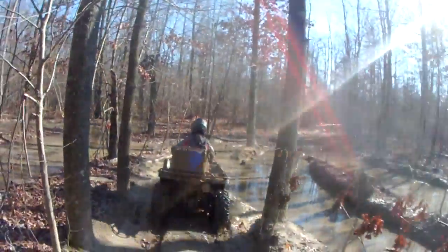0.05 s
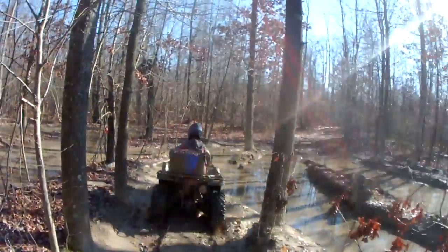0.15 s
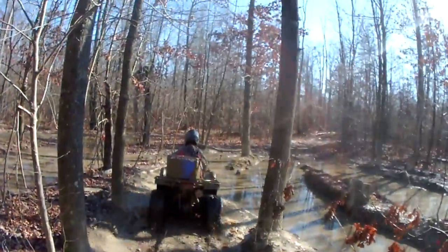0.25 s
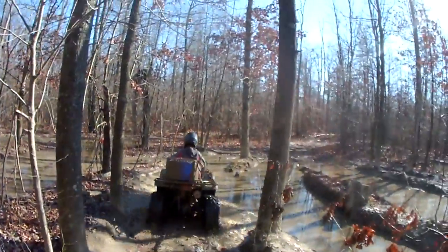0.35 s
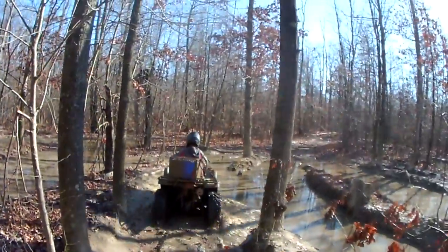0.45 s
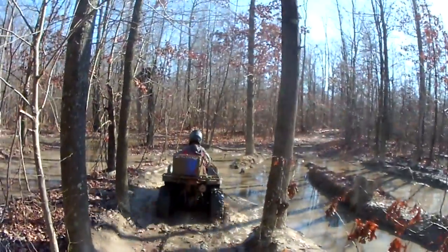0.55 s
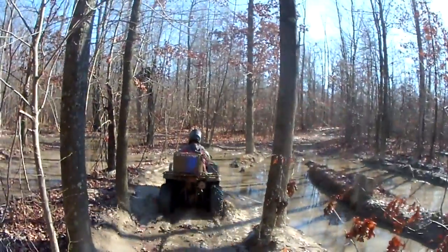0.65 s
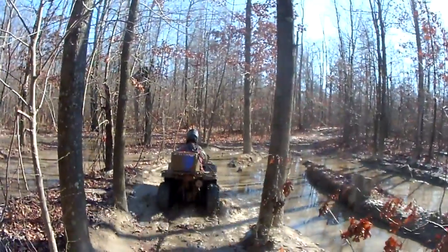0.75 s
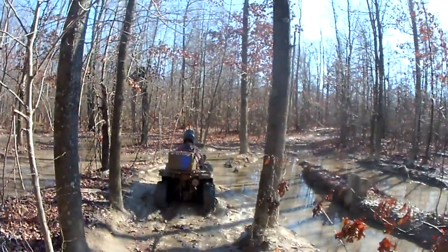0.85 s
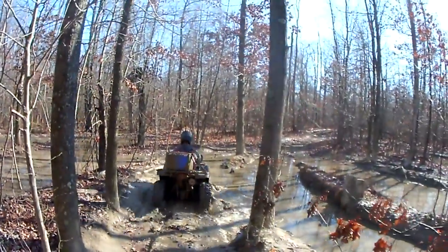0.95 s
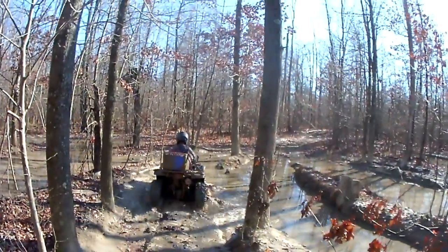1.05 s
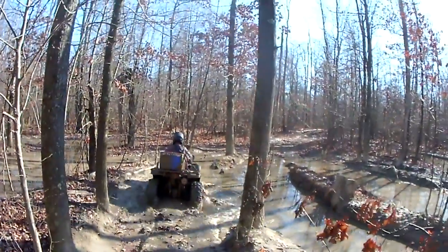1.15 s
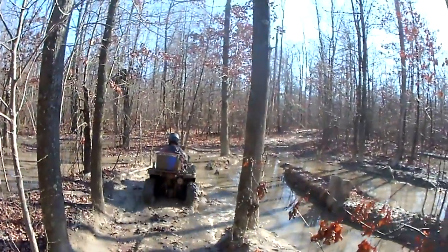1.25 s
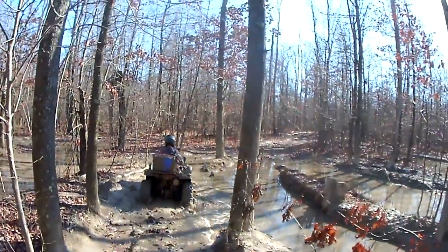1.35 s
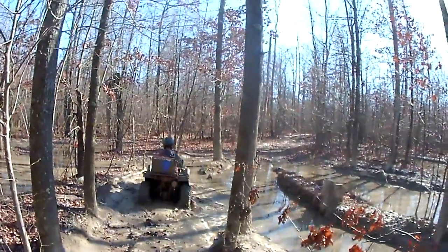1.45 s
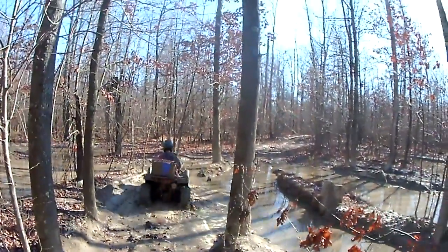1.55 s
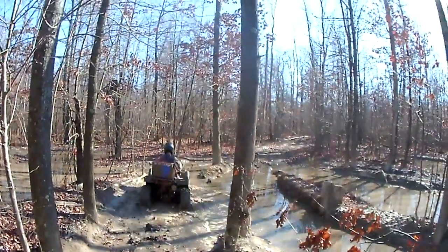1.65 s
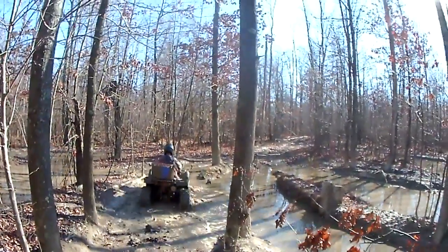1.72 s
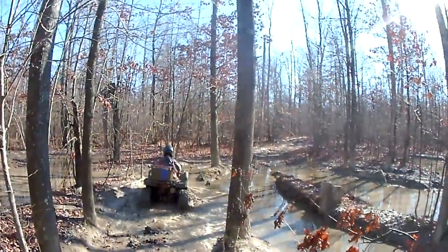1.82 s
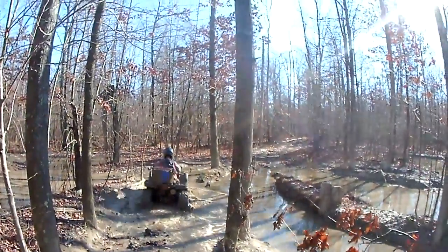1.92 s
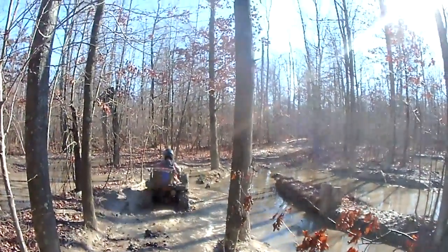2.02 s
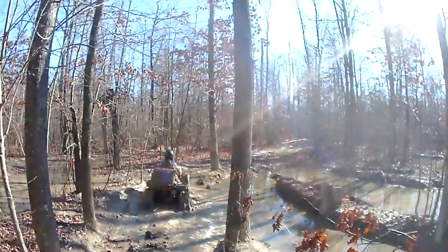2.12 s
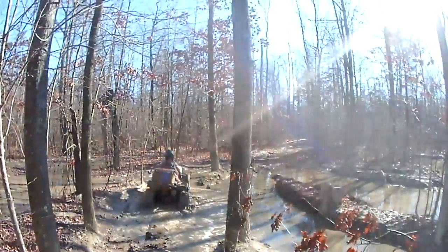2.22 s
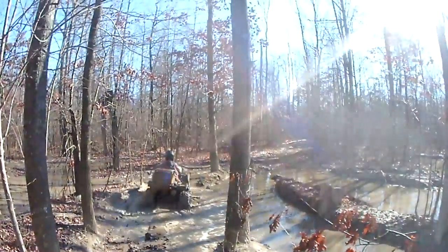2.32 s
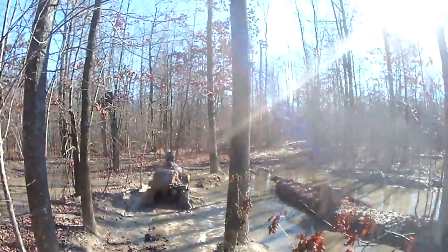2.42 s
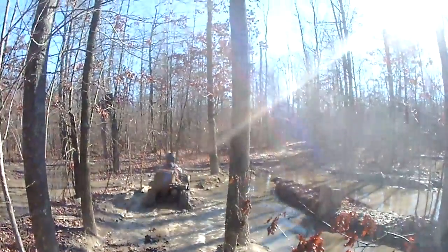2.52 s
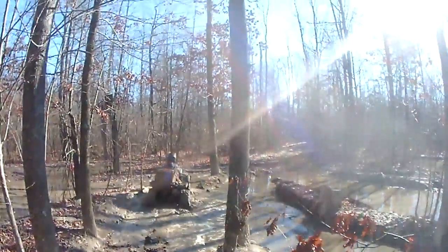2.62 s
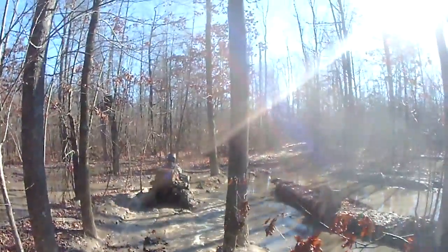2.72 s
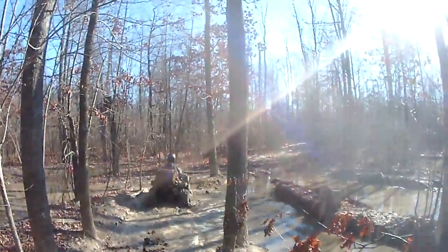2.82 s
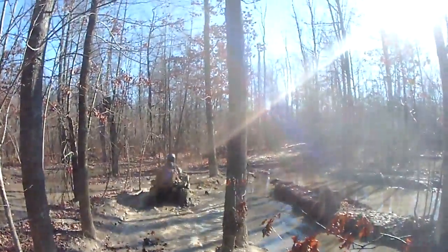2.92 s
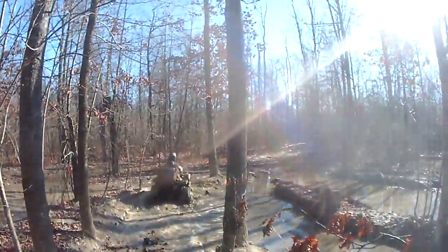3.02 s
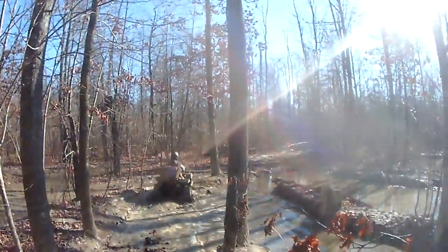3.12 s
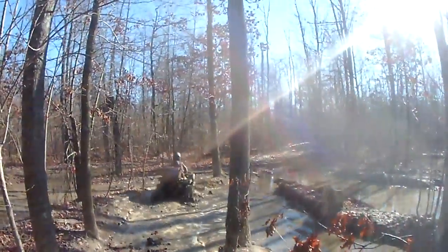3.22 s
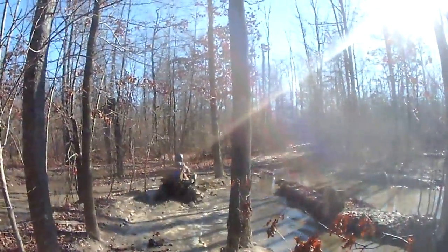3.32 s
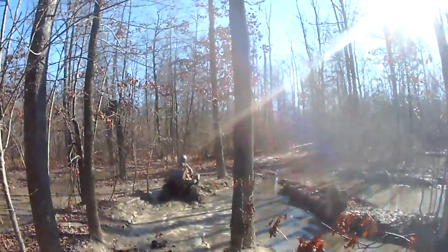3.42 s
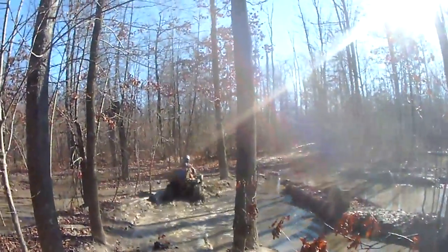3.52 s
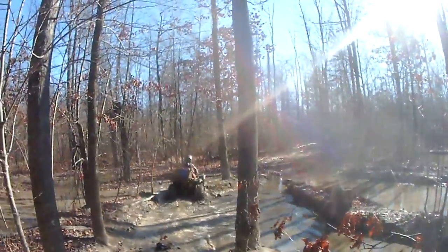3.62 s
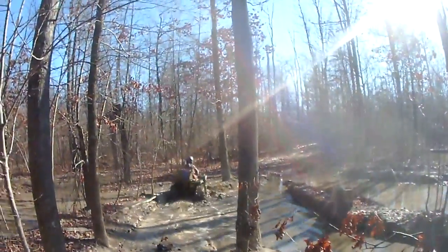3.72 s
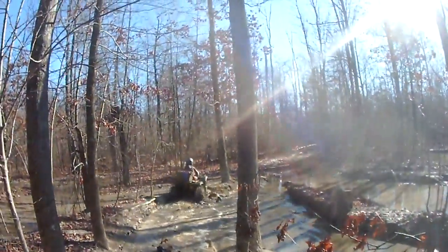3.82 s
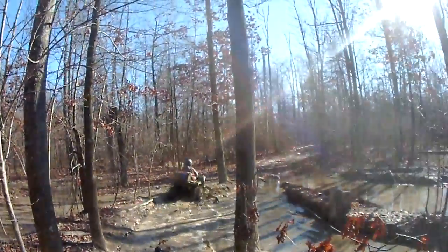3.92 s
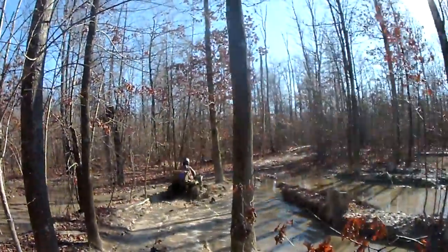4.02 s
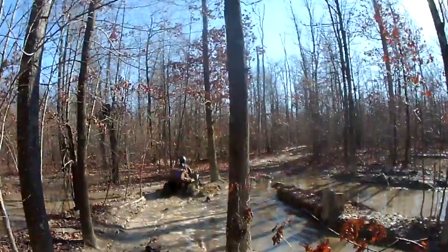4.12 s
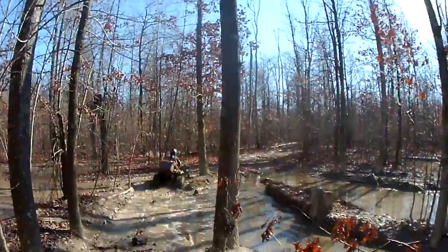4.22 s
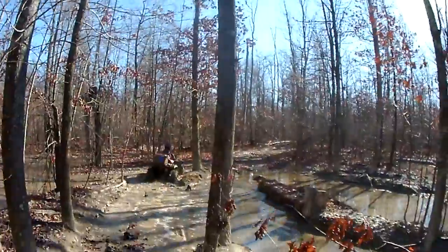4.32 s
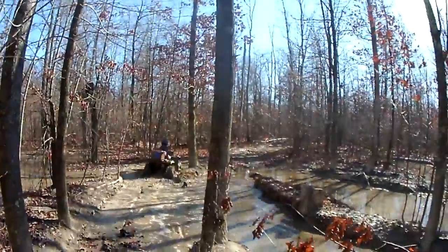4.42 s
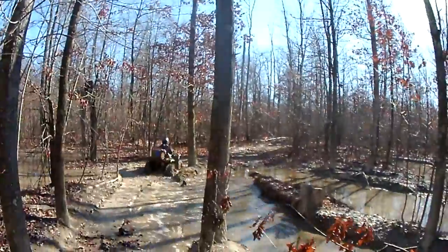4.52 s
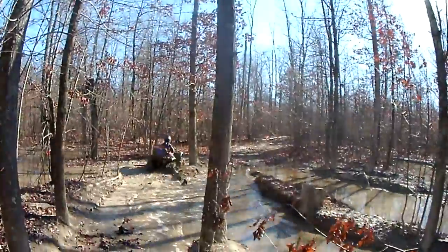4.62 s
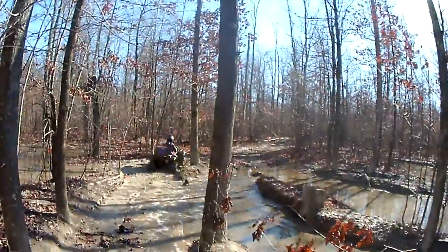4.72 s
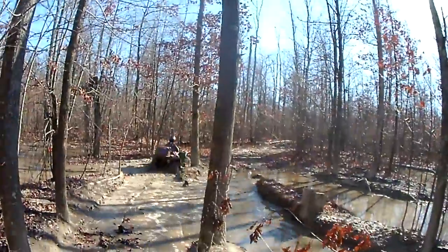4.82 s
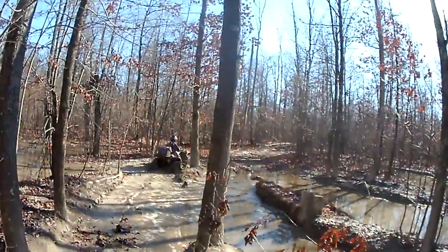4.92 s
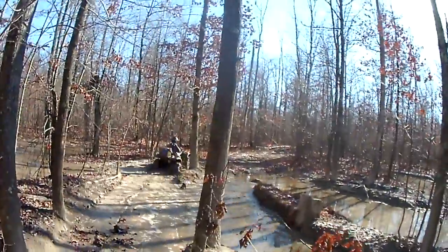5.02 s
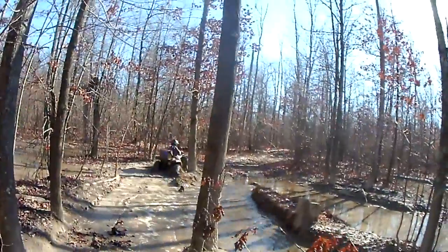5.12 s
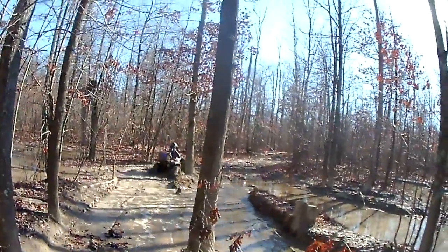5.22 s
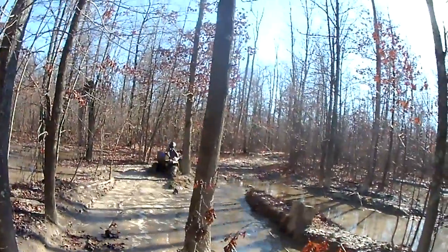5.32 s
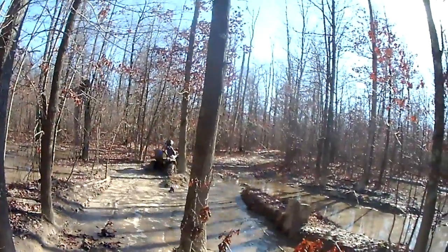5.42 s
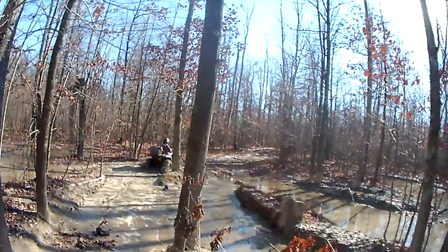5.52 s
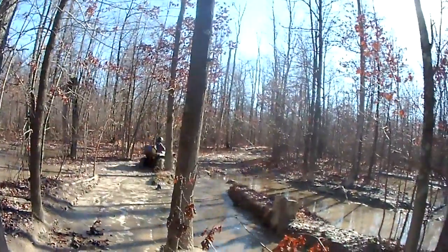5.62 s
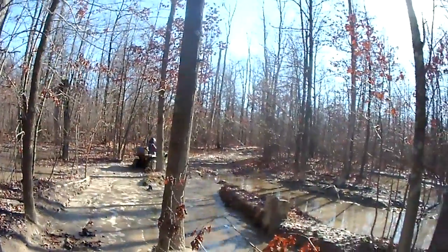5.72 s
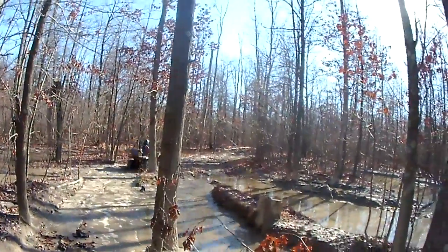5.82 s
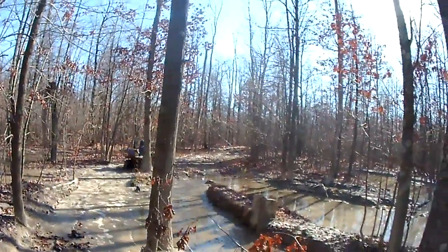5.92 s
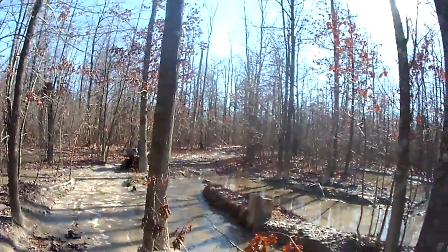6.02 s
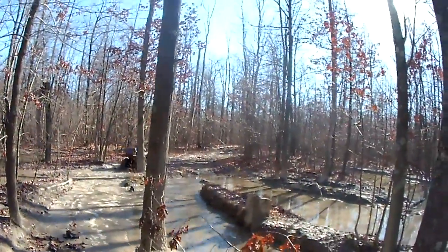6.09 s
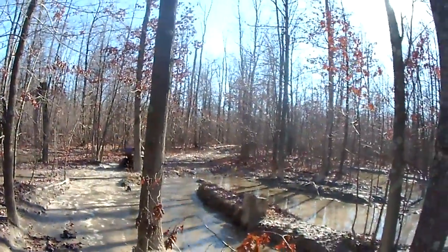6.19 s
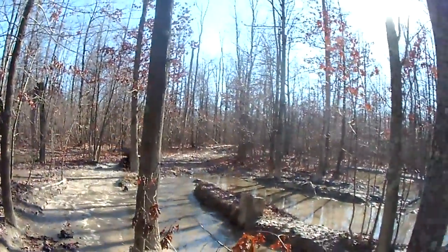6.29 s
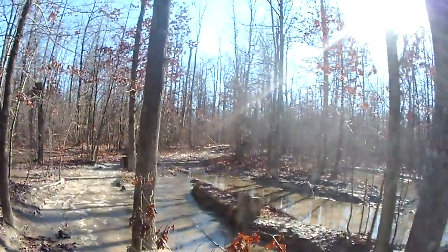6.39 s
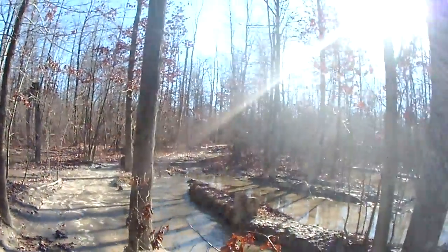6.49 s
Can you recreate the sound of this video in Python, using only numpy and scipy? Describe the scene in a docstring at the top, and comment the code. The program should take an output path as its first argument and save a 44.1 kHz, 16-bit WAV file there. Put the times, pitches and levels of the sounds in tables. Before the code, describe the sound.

A single-cylinder four-wheeler works through a mud hole in bare woods, its separate exhaust pulses audible as a fast, throaty putter of about 15 to 25 per second. It starts low and lugging, with hissing tyre spray, lumpy sloshing and a faint low rumble. Throttle stabs at about 0.3 and 0.8 seconds make the bark swell. From 1.4 to 3.9 a long pull raises the revs; the slosh fades while broad rasp and a nasal metallic muffler ring around 1.7 kHz grow, with irregular harsh cracks overloading the small microphone, strongest near 3.2 to 3.8. The throttle closes and the engine drops back. Five short blips follow at about 4.2, 4.6, 5.1, 5.6 and 6.1, the first still strong, later ones much quieter as the machine draws away. Spray thins, and at the end, near 6.5, a weak ringing putter remains.

```python
"""Four-wheeler in a mud hole

A single-cylinder four-wheeler labours away through mud in bare woods: two stabs of throttle, one long pull, five blips.
Each firing, roughly 15 to 25 a second, sets the modes of the exhaust pipe thumping and lets out a jet of gas,
heard as a broad rasp and the ring of the muffler; an open throttle raises the revs and strengthens the bark.
Shaped noise makes the hissing spray, the sloshing water and a low rumble; the hardest barks overload the microphone."""
import sys
import numpy as np
from scipy import signal
from scipy.fft import rfft, irfft, next_fast_len
from scipy.io import wavfile
from scipy.ndimage import map_coordinates

SR = 44100
rng = np.random.default_rng(int(sys.argv[2]) if len(sys.argv) > 2 else 0)


def pcm_store(signal):
    """Save signal as 16-bit PCM."""
    levels = np.round(np.clip(np.atleast_2d(signal), -1, 1) * 32767)
    wavfile.write(sys.argv[1], SR, levels.astype(np.int16).T)


N = 288855
TIME = np.arange(N) / SR  # seconds
NOMINAL_SPEED = 23  # firings per second at which the engine's settings hold


def from_db(db):
    """Logarithmic level: decibels become an amplitude factor."""
    return 10 ** (np.asarray(db) / 20)


def rms_one(x):
    """Normalisation: the signal is scaled to unit mean power."""
    return x / np.sqrt(np.mean(x ** 2) + 1e-20)


def read(rows, when=TIME):
    """Linear interpolation: each column of a curve is read at the given values of its first column."""
    position, *columns = np.transpose(rows)
    return [np.interp(when, position, column) for column in columns]


def noise(spectrum):
    """Spectral shaping: white noise is filtered to a given colour and scaled to unit power."""
    hz, level_db = np.transpose(spectrum)
    size = next_fast_len(N)
    bins = np.maximum(np.fft.rfftfreq(size, 1 / SR), 1)
    gain = from_db(np.interp(np.log(bins), np.log(hz), level_db))
    white = rng.standard_normal(size)
    return rms_one(irfft(rfft(white) * gain, size)[:N])


def flicker(per_s):
    """Random modulation: a signal wanders about zero through 4096 random points, then holds the last."""
    return np.interp(TIME * per_s, np.arange(4096), rng.standard_normal(4096))


def around(s):
    """Windowing: the samples near a firing are selected, with their time from it."""
    span = slice(max(0, int((s - .02) * SR)), int((s + .2) * SR))
    return span, TIME[span] - s


def bell(x, hz, width_hz, gain_db):
    """Resonance: a band-pass copy added to the signal raises or lowers one band."""
    band = signal.lfilter(*signal.iirpeak(hz, hz / width_hz, SR), x)
    return x + (from_db(gain_db) - 1) * band


# Wheels churning mud and water, and the steady rush of the muffler.
# Each row: time in seconds, spray level in dB, rush level in dB, both before the gains of churn().
CHURN_LEVELS = [(0, -31.7, -32), (1, -34, -31.5), (2, -36, -36), (2.8, -35, -38), (3.83, -31.5, -33),
                (4.5, -36, -38.5), (4.78, -33.5, -36.5), (5.05, -38.5, -40), (6.15, -43.5, -45),
                (6.55, -41.5, -42)]
# Colour of the spray. Each row: frequency in Hz, relative power density in dB.
SPRAY_COLOUR = [(200, -14), (380, -26.5), (500, -11.5), (720, -7), (1000, -13.5), (2000, 4), (2700, 2.5),
                (4000, 0), (5500, -3.5), (6800, -1.5), (8800, 1.5), (12000, -24.5)]
# Colour of the gas rushing through the muffler. Each row: frequency in Hz, relative power density in dB.
RUSH_COLOUR = [(600, -30.5), (1000, -14), (1300, -6), (1550, 1), (1750, 1.5), (2000, -7), (2500, -9),
               (4000, -43)]


def churn(spray_gain_db=0.0, rush_gain_db=-1.0):
    """Turbulence noise: tyre spray spatters unevenly, while gas rushes on between the firings."""
    spray_db, rush_db = read(CHURN_LEVELS)
    spatter_db = 1.1 * flicker(450)
    spray = from_db(spray_db + spray_gain_db + spatter_db) * noise(SPRAY_COLOUR)
    rush = from_db(rush_db + rush_gain_db) * noise(RUSH_COLOUR)
    return spray + rush


# Colour of water sloshing round the wheels. Each row: frequency in Hz, relative power density in dB.
SLOSH_COLOUR = [(300, -22), (480, -17.5), (720, -1), (950, -2.5), (1300, 0), (2000, -24.5)]
SLOSH_DB, CLIMBS_OUT_S, SLOSH_FADE_DB_PER_S = -49.5, 1.4, 9


def slosh(lumpy_db=4.5):
    """Random amplitude modulation: lumpy splashing fades as the machine climbs out of the hole."""
    fade_db = SLOSH_FADE_DB_PER_S * np.maximum(TIME - CLIMBS_OUT_S, 0)
    lumps_db = lumpy_db * flicker(60)
    return from_db(SLOSH_DB - fade_db + lumps_db) * noise(SLOSH_COLOUR)


# Colour of the outdoor rumble. Each row: frequency in Hz, relative power density in dB.
RUMBLE_COLOUR = [(15, -6), (28, 0), (60, -17.5), (120, -15), (250, -29), (450, -24), (1200, -40)]
RUMBLE_DB = -51


def rumble():
    """Stationary noise: a low outdoor rumble keeps one level and colour."""
    return from_db(RUMBLE_DB) * noise(RUMBLE_COLOUR)


# The rider's throttle openings. Each row: opening time in seconds, closing time in seconds,
# firings per second gained if held open, bark gained in dB.
THROTTLE_OPENINGS = [(.311, .506, 1.746, 6.5), (.771, 1.126, .184, 6), (1.354, 3.862, 3.372, 7.3),
                     (4.169, 4.385, 1.691, 2.4), (4.619, 4.855, 3.442, 4.5), (5.082, 5.331, 3.159, 8.6),
                     (5.605, 5.834, 3.107, 8.3), (6.127, 6.339, 1.924, 4.6)]
# Revs that the mud allows on a light throttle. Each row: time in seconds, firings per second.
CRUISING_SPEED = [(0, 14.98), (.232, 15.94), (.728, 19.605), (1.297, 20.99), (1.708, 18.38), (2.308, 19.88),
                  (2.673, 20.045), (3.863, 22.485), (4.602, 21.89), (5.057, 19.615), (6.054, 19.45),
                  (6.55, 20.835)]
THUMB_S, FLYWHEEL_S = .0927, .1407  # time to move the throttle; time constant of the revs behind it


def throttle():
    """Rotational inertia: the bark (dB) answers at once, the revs (firings per s) lag with the flywheel."""
    opens, closes, revs, bark_db = np.transpose(THROTTLE_OPENINGS)
    to_nearest_edge = np.minimum(TIME - opens[:, None], closes[:, None] - TIME)
    opening = np.clip(to_nearest_edge / THUMB_S + .5, 0, 1)
    keep = np.exp(-1 / (FLYWHEEL_S * SR))
    gained = signal.lfilter([1 - keep], [1, -keep], revs @ opening)
    return read(CRUISING_SPEED)[0] + gained, bark_db @ opening


def firings(speed):
    """Phase accumulation: one firing occurs each time the engine completes a cycle."""
    cycles = np.cumsum(speed) / SR - .11
    return np.interp(np.arange(int(cycles[-1]) + 1), cycles, TIME)


# The exhaust on a light throttle, as the machine digs in and then draws away; exhaust() reads the bark.
# Each row: time in seconds, bark level in dB before the gains of rasp and ring, thump level in dB.
EXHAUST_LEVEL = [(0, -32.5, -38), (.9, -28, -36), (1.5, -26, -38.6), (1.95, -26, -39.3), (2.1, -24, -39.3),
                 (3.6, -23.5, -40.5), (3.95, -24.5, -42), (4.5, -20.5, -41.5), (4.8, -26, -44.5),
                 (5.05, -33, -43.5), (6.1, -35.5, -46), (6.55, -33, -43)]
# Pipe modes at the nominal note, their signs alternating. Each row: frequency in Hz, relative level in dB,
# 60 dB decay time in seconds, how far it follows the note from 0 to 1.
PIPE_MODES = [(47, -17, 0.52, 0.4), (116.3, 5.5, 0.16, 0.61), (154, -5.5, 0.026, 1),
              (201.2, -4.5, 0.098, 0.5), (270.1, -13.5, 0.23, 0.2), (301.8, -20.5, 0.33, 0),
              (561, -12.5, 0.081, 0), (659, -13.5, 0.12, 0.03)]
NOMINAL_NOTE_HZ = 118.7  # the note at which the modes have their listed pitches
# the pipe's note rises with the revs, as the gas gets hotter
NOTE_AT_NOMINAL_SPEED_HZ, NOTE_FOLLOWS = 115.4, 0.57
THUMP_FOLLOWS = 0.18  # share of the bark's swell that the thump takes on


def thump(fired, speeds, swell_db, lead_s=0.00582, opening_s=0.0021, uneven_db=0.3, bite_db=9.5):
    """Modal excitation: the opening valve sets the pipe's low modes ringing just before the gas escapes."""
    out = np.zeros(N)
    for s, speed, chance in zip(fired, speeds, rng.standard_normal(len(fired))):
        note_hz = NOTE_AT_NOMINAL_SPEED_HZ * (speed / NOMINAL_SPEED) ** NOTE_FOLLOWS
        span, t = around(s - lead_s)
        t = np.maximum(t, 0)
        opened = 1 - np.exp(-(t / opening_s) ** 2)
        for k, (hz, level_db, t60, follows) in enumerate(PIPE_MODES):
            pitch = hz * (note_hz / NOMINAL_NOTE_HZ) ** follows
            # a faster valve strikes the upper modes harder
            tilt_db = bite_db * np.log2(speed / NOMINAL_SPEED) * np.log2(hz / NOMINAL_NOTE_HZ)
            height = opened * from_db(level_db + tilt_db + uneven_db * chance - 60 * t / t60)
            out[span] += (-1) ** k * height * np.sin(2 * np.pi * pitch * t)
    level_db = read(EXHAUST_LEVEL)[1] + THUMP_FOLLOWS * swell_db
    return from_db(level_db) * rms_one(out)


def puff(t, rise_s, fall_s):
    """Pulsed flow: one jet of gas swells and collapses along two half-Gaussians."""
    return np.exp(-(t / np.where(t < 0, rise_s, fall_s)) ** 2)


# Colour of the turbulent jet. Each row: frequency in Hz, relative power density in dB.
RASP_COLOUR = [(200, -35), (420, -25.5), (800, -19), (1150, -5), (2000, -1.5), (2400, -1.5), (3000, 3.5),
               (3900, -6), (4700, -1), (5600, -7), (6700, -1.5), (9500, -4.5), (12000, -14)]


def rasp(fired, speeds, level_db, rise_s=0.0033, fall_s=0.0032, tail_db=-4.5, tail_s=0.0092,
         tail_cut_hz=4500, swing_db=-8.5, swing_s=0.01, swing_width_s=0.0069, lugging_db=18.0,
         crackle_db=3.5, patchy_db=4.0):
    """Jet noise: each firing spits turbulent gas, a back-swing puff and a dull tail scattered by the trunks."""
    gas = noise(RASP_COLOUR) * from_db(crackle_db * flicker(900))
    dull = signal.butter(2, min(tail_cut_hz, SR / 3), fs=SR, output="sos")
    scattered = signal.sosfilt(dull, noise(RASP_COLOUR))
    patch_hz = np.linspace(1500, 10000, 18)
    colours = rng.standard_normal((len(fired), len(patch_hz)))
    out = np.zeros(N)
    for s, db, speed, colour in zip(fired, level_db, speeds, colours):
        span, t = around(s)
        # no two jets have quite the same treble
        bins = np.fft.rfftfreq(len(t), 1 / SR)
        colour_db = patchy_db * np.interp(bins, patch_hz, colour, left=0)
        jet = irfft(rfft(gas[span]) * from_db(colour_db), len(t))
        main = puff(t, rise_s, fall_s)
        # at low revs the valve is still open on the back swing, so the second puff rivals the first
        second_db = swing_db + lugging_db * np.log2(NOMINAL_SPEED / speed)
        swing = from_db(second_db) * puff(t - swing_s, swing_width_s, swing_width_s)
        tail = from_db(tail_db) * np.exp(-np.abs(t) / tail_s) * (1 - main) * (t > 0)
        # the charge of the cylinder sets the energy of the jet, whatever its turbulence
        energy = np.sum((main * jet) ** 2) / np.sum(main ** 2)
        direct = jet * main / np.sqrt(energy)
        out[span] += from_db(db) * (direct + rms_one(jet) * swing + scattered[span] * tail)
    return out


# The muffler's upper note. Each row: time in seconds, centre frequency in Hz.
MUFFLER_NOTE = [(0, 1742), (1.4, 1627), (3.2, 1677), (4.7, 1757), (5.4, 1706), (5.7, 1571), (6.55, 1497)]
# Colour of the diffuse ring. Each row: frequency in Hz at the reference note, relative power density in dB.
RING_COLOUR = [(500, -30.5), (950, -50), (1200, -17.5), (1400, -4.5), (1560, -2), (1690, -8), (1820, 4.5),
               (2000, -8), (2400, -9), (4000, -63.5)]
RING_HZ = 1690  # reference note, at which the diffuse ring keeps its listed colour


def ring(fired, level_db, rise_s=0.0024, fall_s=0.0019, scatter=0.0294, sag=0.013, lower_hz=1220,
         lower_scatter=0.058, lower_db=-9.0, lower_speaks_db=-17.0, breathy_db=-10.0,
         echo_db=-10.5, echo_s=.0065, echo_spread_db=1.0, tail_db=-7.5, tail_s=0.012):
    """Cavity resonance: the jet blows two muffler notes, which return off the ground and the trunks."""
    centre_hz = read(MUFFLER_NOTE)[0]
    # reading the noise at a varying rate makes the diffuse ring glide with the note
    place = np.cumsum(centre_hz / RING_HZ)
    diffuse = map_coordinates(noise(RING_COLOUR), [place], order=3, mode="wrap")
    out = np.zeros(N)
    for s, db, chance in zip(fired, level_db, rng.standard_normal((len(fired), 6))):
        span, t = around(s)
        # the note differs from firing to firing and sags as the pressure drops
        hz = centre_hz[int(s * SR)] * (1 + scatter * chance[0] - sag * np.tanh(t / fall_s))
        upper = np.sin(2 * np.pi * (np.cumsum(hz) / SR + chance[1]))
        # the lower note speaks only in strong barks, and saturates in the hardest
        lower_gain = from_db(lower_db - abs(db - lower_speaks_db))
        lower_pitch = lower_hz * (1 + lower_scatter * chance[4])
        lower = lower_gain * np.sin(2 * np.pi * (lower_pitch * t + chance[5]))
        main = puff(t, rise_s, fall_s)
        direct = main * (np.sqrt(2) * (upper + lower) + from_db(breathy_db) * diffuse[span])
        delayed = np.interp(t - echo_s * (1 + 0.152 * chance[3]), t, direct)
        echo = from_db(echo_db + echo_spread_db * chance[2]) * delayed
        fading = from_db(tail_db) * np.exp(-np.abs(t) / tail_s) * (1 - main) * (t > 0)
        out[span] += from_db(db) * (direct + echo + fading * diffuse[span])
    return out


# Single firings with levels of their own. Each row: time in seconds, peak level of the ring in dB,
# rasp level in dB, both before the trims for hard firings.
HARD_FIRINGS = [(2.0637, -14, -15.5), (2.152, -7.5, -18.5), (2.2393, -10, -16.5), (2.4977, -6.5, -18),
                (2.6254, -12, -19), (2.7526, -8, -18.5), (3.0046, -7.5, -20), (3.2111, -2, -17.5),
                (3.2919, -4.5, -19), (3.3328, -5.5, -17.5), (3.3722, -3, -17.5), (3.5324, -4.5, -18.5),
                (3.6117, -6, -16), (3.6905, -0.5, -17), (3.7299, -1.5, -17.5), (4.3121, -8.5, -21),
                (4.7067, -10.5, -22.5), (5.1163, -19, -28), (5.2545, -21, -23), (5.684, -19, -28)]
# The muffler starts to sing as the revs climb.
# Each row: firings per second, ring relative to the bark in dB before the ring's gain.
RING_ONSET = [(20.8, -4), (23.3, 0.5), (25, 3)]
# Brush comes between and screens the rasp more than the ring, so the ring gains on the rasp.
# Each row: time in seconds, added ring level in dB.
SCREENING = [(6.1, -0.5), (6.45, 8)]


def exhaust(fired, speeds, swell_db, rasp_gain_db=0.5, ring_gain_db=1.0, hard_ring_db=-5.0,
            hard_rasp_db=2.5, rasp_spread_db=.6, ring_spread_db=3.0, delay_s=0.00029, jitter_s=0.00028):
    """Superposition: the broad rasp of the jet and the narrow ring of the muffler bark together."""
    chance = rng.standard_normal((len(fired), 3))
    bark_db = read(EXHAUST_LEVEL, fired)[0] + swell_db
    rasp_db = bark_db + rasp_gain_db + rasp_spread_db * chance[:, 1]
    singing_db = read(RING_ONSET, speeds)[0] + read(SCREENING, fired)[0]
    ring_db = bark_db + singing_db + ring_gain_db + ring_spread_db * chance[:, 2]
    for s, peak_db, crack_db in HARD_FIRINGS:
        nearest = np.argmin(np.abs(fired - s))
        ring_db[nearest] = peak_db + hard_ring_db
        rasp_db[nearest] = crack_db + hard_rasp_db
    at = np.clip(fired + delay_s + jitter_s * chance[:, 0], 0, TIME[-1])
    return rasp(at, speeds, rasp_db) + ring(at, ring_db)


def scene():
    """Linear superposition: mud, water, outdoor rumble and engine add at the microphone."""
    surroundings = churn() + slosh() + rumble()
    speed, swell_db = throttle()
    fired = firings(speed)
    speeds = np.interp(fired, TIME, speed)
    thumps = thump(fired, speeds, swell_db)
    barks = exhaust(fired, speeds, np.interp(fired, TIME, swell_db))
    return (surroundings + thumps + barks)[None]


def record(dry):
    """Transduction: a small microphone adds a treble notch and peak, a narrow band and lopsided overload."""
    notch = signal.butter(2, [7200, 8400], "bandstop", fs=SR, output="sos")
    notched = signal.sosfilt(notch, dry)
    coloured = bell(notched, hz=9200, width_hz=900, gain_db=4.5)
    narrow = signal.sosfilt(signal.ellip(10, .3, 70, 9620, fs=SR, output="sos"), coloured)
    # an even power bends both half-waves upwards
    bent = narrow + .04 * narrow ** 6
    # peaks flatten towards 0.73
    rounded = bent / (1 + (bent / .73) ** 16) ** (1 / 16)
    # the overload's products above 15.9 kHz are removed
    return signal.sosfilt(signal.cheby2(12, 70, 15900, fs=SR, output="sos"), rounded)


dry = scene()
out = record(dry)
pcm_store(out)
```